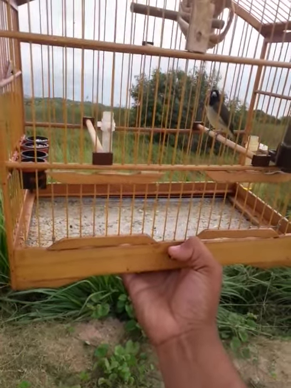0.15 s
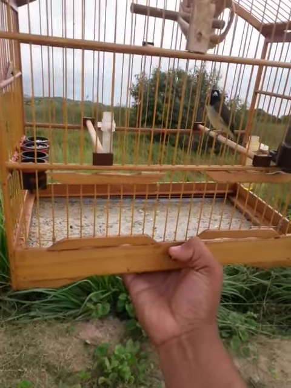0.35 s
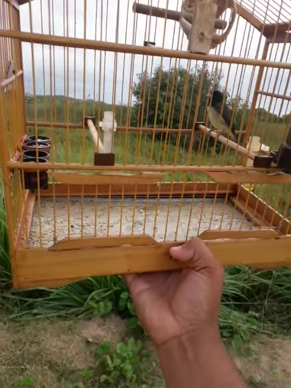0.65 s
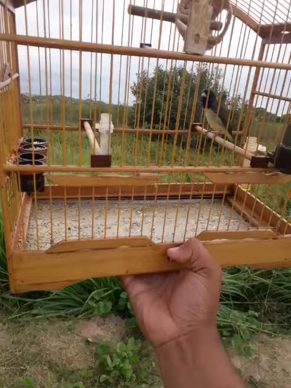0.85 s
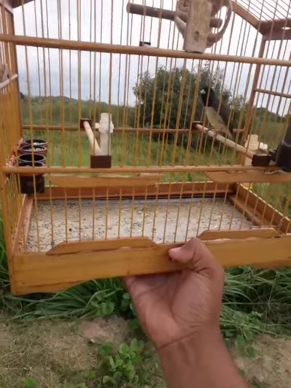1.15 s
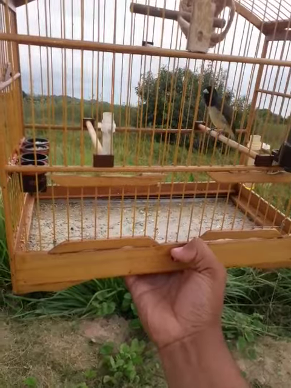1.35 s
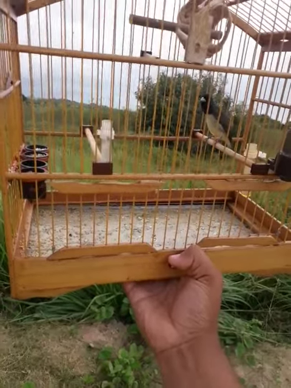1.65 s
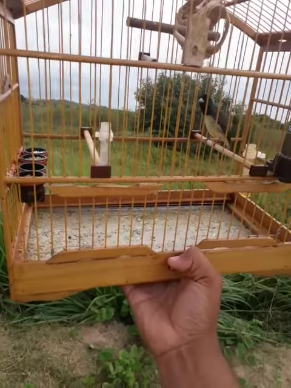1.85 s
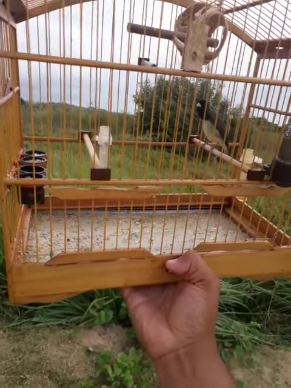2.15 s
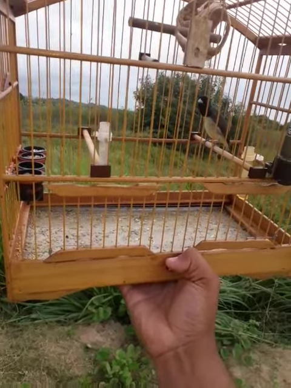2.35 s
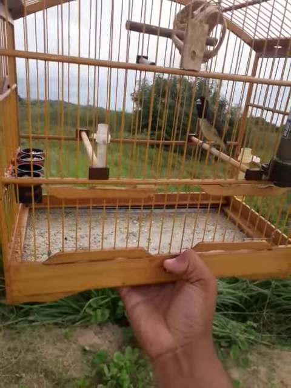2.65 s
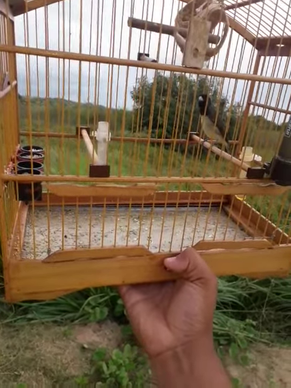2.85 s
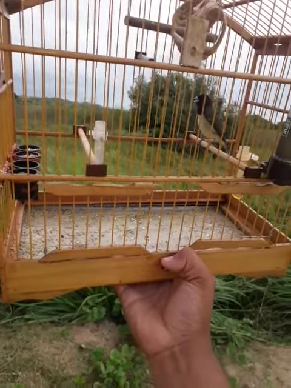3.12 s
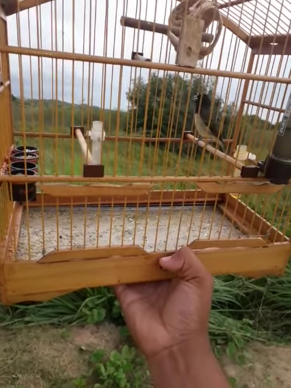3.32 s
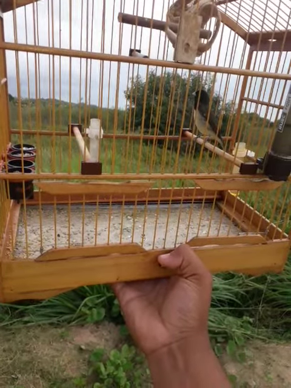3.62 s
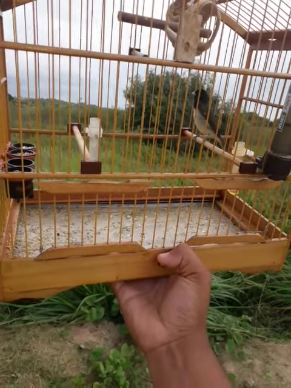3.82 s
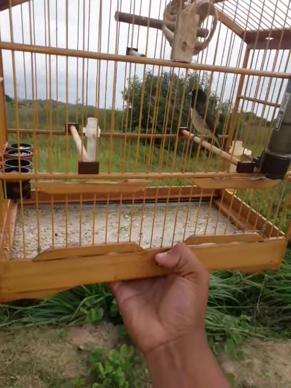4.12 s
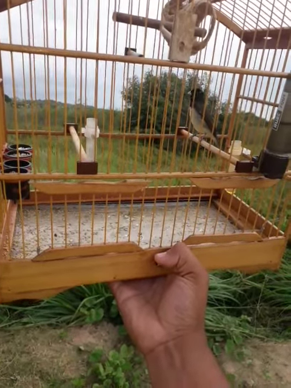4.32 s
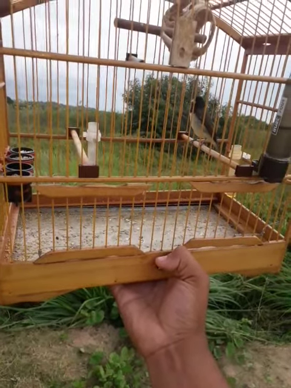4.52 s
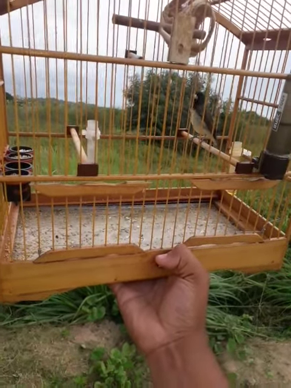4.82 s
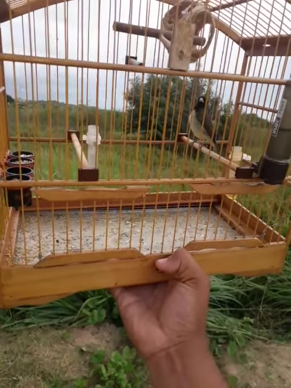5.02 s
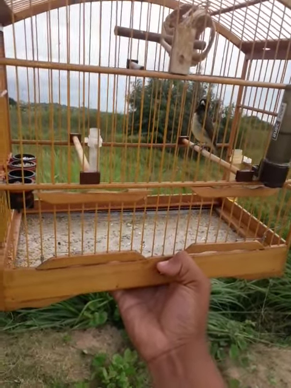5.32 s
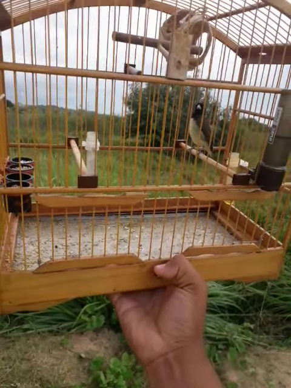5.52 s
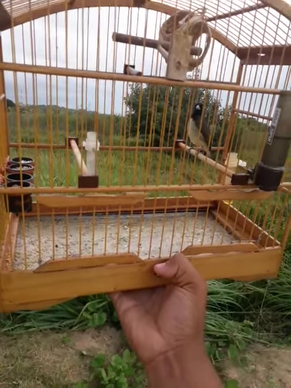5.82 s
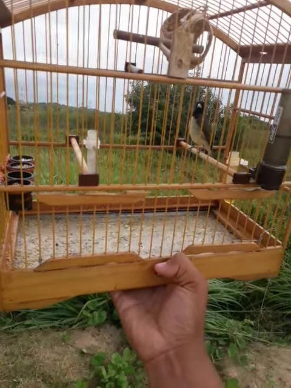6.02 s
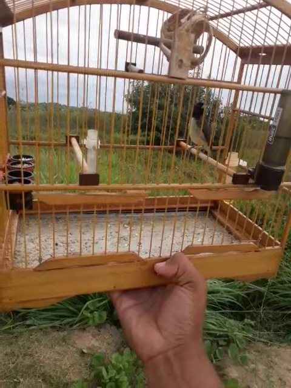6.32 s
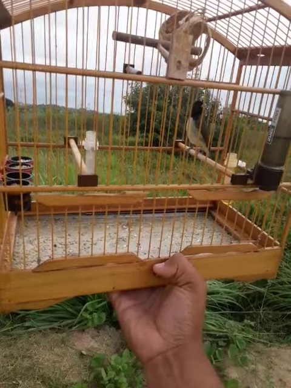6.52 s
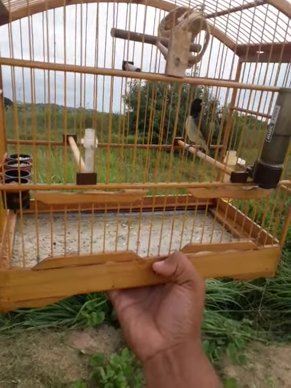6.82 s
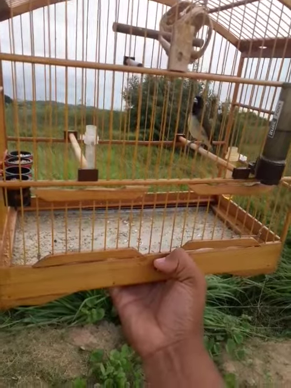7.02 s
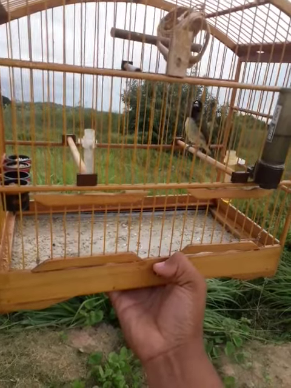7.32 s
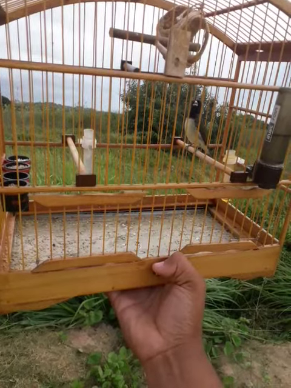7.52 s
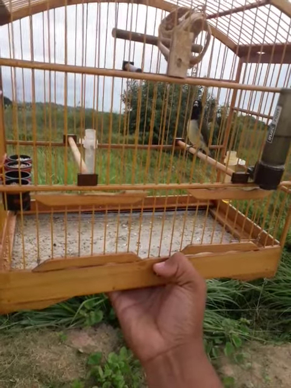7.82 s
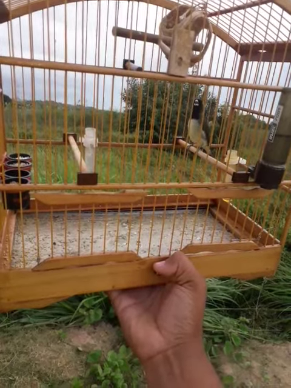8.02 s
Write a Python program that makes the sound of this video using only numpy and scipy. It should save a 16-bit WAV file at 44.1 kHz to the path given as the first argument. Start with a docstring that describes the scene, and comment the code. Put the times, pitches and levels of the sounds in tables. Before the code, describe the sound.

A small caged songbird gives quick, buzzy trills ending in high whistles, over faint insects, breeze and distant dogs.

```python
"""A small caged songbird sings in open grassland, an arm's length from a phone.
From the start, a low rumble and a breeze lie under rasping insects, far dogs and birds in the bushes.
At about 2.5 s the songbird gives three calls, each a buzzy trill of quick notes ending in a whistle.
Three more follow from 7 s, and at 8 s a last call warbles and slides down. The notes come from its
voice box (the syrinx), and the cage tray adds a short echo."""
import sys
import numpy as np
from scipy import signal
from scipy.fft import rfft, irfft, next_fast_len
from scipy.io import wavfile
from scipy.ndimage import uniform_filter1d, map_coordinates

SR = 44100
rng = np.random.default_rng(int(sys.argv[2]) if len(sys.argv) > 2 else 0)


def store_pcm(level_fs):
    """Save levels as 16-bit WAV."""
    pcm = np.round(np.clip(level_fs, -1, 1) * 32767).astype(np.int16)
    wavfile.write(sys.argv[1], SR, np.atleast_2d(pcm).T)


N = 359415

# The songbird's trills, each with a note held under the start of its whistle: (first note [s],
# last note [s], full level [dB], note end over note start [dB], note length [ms],
# held note's start pitch [Hz], its end pitch [Hz], its level [dB])
TRILLS = [(2.559, 2.64, -19, 6, 14.6, 4160, 3930, -20), (2.95, 3.049, -13, 5, 19.6, 4300, 4140, -12.5),
          (3.224, 3.336, -11.5, 5, 16.4, 4010, 4300, -23), (7.049, 7.127, -16, 3, 16.8, 3980, 4040, -31),
          (7.462, 7.544, -13.5, 5, 21.5, 3840, 4300, -7), (7.722, 7.839, -10.5, 6, 18.1, 3840, 3900, -24.5)]
# The whistle after each trill, one list of points each: (time [s], pitch [Hz], level [dB])
WHISTLES = [
    [(2.648, 4600, -21), (2.656, 4690, -17), (2.676, 4840, -16), (2.702, 5040, -20.5), (2.724, 4770, -17.5),
     (2.735, 4750, -37)],
    [(3.059, 4630, -17), (3.069, 4710, -11), (3.093, 4930, -8.5), (3.125, 4740, -7.5), (3.135, 4794, -16.5),
     (3.142, 4370, -26.5)],
    [(3.349, 4340, -13.5), (3.361, 4415, -9.5), (3.397, 4372, -11), (3.411, 4290, -15), (3.421, 4440, -24)],
    [(7.135, 4200, -20), (7.143, 4780, -19), (7.153, 4930, -14), (7.181, 4775, -11), (7.205, 4713, -13.5),
     (7.214, 4550, -26)],
    [(7.562, 4330, -11), (7.572, 4430, -15.5), (7.602, 4607, -4), (7.638, 4620, -7), (7.646, 4490, -10.5),
     (7.653, 4540, -33)],
    [(7.85, 4060, -21), (7.852, 4140, -11.5), (7.91, 4288, -10.5), (7.922, 4150, -12.5), (7.932, 4500, -34)],
]
# How each call sounds as the head turns. A partial is a tone at a multiple of the pitch. (start [s],
# tray echo strength [0-1], pitch the echo weakens [Hz], second partial [dB], third partial [dB])
HEAD_POSES = [(2.5, 0.33, 3994, -25, -31), (2.9, 0.34, 4030, -29.5, -24.5), (3.2, 0.41, 4193, -30.5, -23),
              (7.0, 0.2, 4230, -26, -26), (7.4, 0.61, 3963, -29.5, -21.5), (7.7, 0.25, 4090, -30, -19),
              (7.98, 0.32, 3986, -33, -38)]


def undb(db):
    """Turn decibels into a factor to multiply by."""
    return 10 ** (np.asarray(db) / 20)


def level(x, db):
    """Scale a sound to an average (rms) level."""
    return x * undb(db) / np.sqrt(np.mean(x ** 2))


def band(x, hz, width, order=2):
    """Keep the frequencies around hz."""
    sos = signal.butter(order, [hz - width / 2, hz + width / 2], "band", fs=SR, output="sos")
    return signal.sosfilt(sos, x)


def hiss(hz, width, order=2):
    """Noise around hz."""
    return band(rng.standard_normal(N), hz, width, order)


def wander(rate):
    """A smooth random curve, typically within -1 to 1, with `rate` new values a second."""
    hold = int(SR / rate)
    steps = np.repeat(rng.standard_normal(N // hold + 1), hold)
    return 1.317 * uniform_filter1d(uniform_filter1d(steps, hold), hold)[:N]


def add_note(out, s, hz, gain, partials):
    """Add a note at time s: pitch and gain per sample, partials as (multiple, level [dB])."""
    start = int(s * SR)
    phase = 2 * np.pi * (np.cumsum(hz) / SR + rng.random())
    tone = sum(undb(db) * np.sin(k * phase) * (k * hz < .45 * SR) for k, db in partials)
    out[start:start + len(tone)] += (np.sqrt(2) * gain * tone)[:N - start]


def glides(table, partials, wobble, edge, fade_db=0):
    """Notes that slide along a curved, unsteady pitch; a larger edge softens their ends."""
    out, drift = np.zeros(N), 1 + wobble * wander(60)
    for s, length_s, start_hz, end_hz, bend_hz, db in table:
        u = np.linspace(0, 1, int(length_s * SR))  # progress through the note
        hz = (start_hz + (end_hz - start_hz) * u + bend_hz * np.sin(np.pi * u)) * drift[:len(u)]
        drift = np.roll(drift, -len(u))
        add_note(out, s, hz, undb(db + fade_db * u) * np.sin(np.pi * u) ** edge, partials)
    return out


def field_echoes(x, fade_s, low_hz, high_hz, delay_s=0):
    """Grass and bushes scatter a sound into echoes that fall 60 dB in fade_s."""
    t = np.arange(int(fade_s * SR)) / SR
    tail = band(rng.standard_normal(len(t)), (low_hz + high_hz) / 2, high_hz - low_hz, order=1)
    tail *= 1000 ** (-t / fade_s)
    tail /= np.sqrt(np.sum(tail ** 2))
    return signal.fftconvolve(x, np.pad(tail, (int(delay_s * SR), 0)))[:N]


def air():
    """Distant rumble and breeze in the grass; soft gusts bump the microphone."""
    # The tone of the rumble and breeze: (frequency [Hz], relative level [dB])
    spectrum = [(30, -18), (70, -7.5), (140, -5), (200, -19.5), (500, -16), (1500, -31), (4500, -28.5),
                (10500, -31), (15700, -31)]
    hz, db = np.transpose(spectrum)
    size = next_fast_len(N)
    freqs = np.maximum(np.fft.rfftfreq(size, 1 / SR), 1)
    shape = undb(np.interp(np.log(freqs), np.log(hz), db))
    breeze = irfft(rfft(rng.standard_normal(size)) * shape, size)[:N]
    gusts = level(hiss(84.5, 68.8, order=3), -83) * undb(4.01 * wander(6))
    slack_start_db = -6 * np.exp(-np.arange(N) / SR / .3)
    return level(breeze, -66) * undb(wander(3.3) + slack_start_db) + gusts


def insects():
    """Countless wing clicks ring in narrow bands and throb a little."""
    # Bands of the chorus: (centre [Hz], width [Hz], level [dB], throb rate [Hz], throb depth [0-1])
    chorus = [(5457, 640, -63.5, 31.2, 0.15), (6543, 640, -50, 52, 0.25), (8996, 1210, -56, 190, .05),
              (12770, 2200, -75, 31, 0)]
    t, out = np.arange(N) / SR, np.zeros(N)
    for hz, width, db, throb_hz, depth in chorus:
        clicks = rng.standard_normal(N) * undb(2.4 * rng.standard_exponential(N))
        throb = 1 + depth * np.sin(2 * np.pi * throb_hz * t + .9 * wander(14))
        out += level(band(clicks, hz, width, order=3), db) * throb * undb(wander(14))
    return out * np.interp(t, [0, .8], [undb(-3), 1])


def katydid(stroke_hz=26.8):
    """One nearby bush cricket rasps on and off with quick strokes of its wings."""
    # Spells of rasping: (start [s], end [s], level [dB])
    spells = [(.55, 1.197, -77.5), (1.85, 2.6, -75), (4.45, 5.398, -74), (6.088, 7, -76.5)]
    t = np.arange(N) / SR
    gain = sum(undb(db) * (t > start) * (t < end) for start, end, db in spells)
    strokes = np.exp(-(stroke_hz * t % 1) / .15)
    wings = hiss(11700, 1300) + hiss(14900, 2000)
    return uniform_filter1d(gain, size=2000) * level(strokes * wings, 0)


def dogs(bark_s=.12, pitch_sag=.97):
    """Hoarse far barks: vocal folds shake unevenly, and breath fills the gaps between partials."""
    # Single barks: (time [s], strongest partial [Hz], relative level [dB])
    barks = [(0.015, 678.5, -76.5), (0.259, 1190, -76.5), (0.439, 556, -70), (.71, 1050, -80),
             (0.84, 559, -72), (1.022, 814, -73.5), (1.246, 959, -78.5), (1.495, 537.4, -69.5),
             (1.6, 579, -73.5), (1.831, 1017, -74), (1.93, 560.5, -68.5), (2.34, 878, -72),
             (2.42, 550, -76), (2.82, 608, -81.5), (3.051, 1042, -79.5), (3.2, 561, -74.5),
             (3.899, 494, -82), (4.549, 520, -81.5), (4.906, 1244, -81), (5.161, 572, -75.5),
             (5.424, 1204, -78.5), (5.59, 645, -77), (5.72, 628, -79.5), (5.86, 1214, -83),
             (6.03, 620, -83.5), (6.435, 1233, -80.5)]
    notes = [(s, bark_s, hz, pitch_sag * hz, 0, db) for s, hz, db in barks]
    tone = glides(notes, [(.5, -6), (1, 5), (2, 0), (3, -10)], wobble=.04, edge=.33, fade_db=-8)
    uneven = 1 + .75 * wander(250)
    loudness = uniform_filter1d(np.abs(tone), size=400)
    breath = loudness ** 2 / loudness.max() * level(hiss(1000, 1000), 0)  # mostly in the nearest barks
    pack = level(hiss(649, 160.04) + hiss(1114, 180.05), -80)  # more dogs, too far to tell apart
    voices = band(tone * uneven + breath, 1200, 1700)
    return undb(4) * voices + field_echoes(voices, .45, 300, 2500) + pack * undb(4 * wander(6))


def bush_whistles():
    """Other birds give thin single notes and faint chirps; one sings a phrase twice."""
    # Single notes: (time [s], length [s], start pitch [Hz], end pitch [Hz], bend in the middle [Hz],
    # relative level [dB]); all pitches are lowered 3% below
    singles = [(.145, .11, 3630, 3530, 402.5, -84.5), (.845, 0.018, 4170, 3770, -1, -69),
               (.975, .035, 3330, 2500, 5.5, -84), (1.03, .097, 1930, 2130, -1.5, -74),
               (1.24, 0.029, 3670, 2800, -38, -77), (1.6, 0.01115, 3280, 2780, 0, -71),
               (1.99, 0.03, 4400, 3640, 0, -75), (2.025, .035, 3750, 4700, 200, -78),
               (2.17, .115, 4130, 3665, 425.5, -71.5), (2.64, 0.1258, 2284, 2310, 5, -71.5),
               (4.12, 0.1317, 2980, 3140, 148.5, -81), (5.705, 0.0335, 2960, 4400, 305, -77),
               (5.815, 0.033, 3180, 4240, 302, -79), (5.878, 0.0512, 5700, 3680, 2, -66),
               (6.04, 0.0496, 3310, 2280, -100, -76.5), (6.29, 0.026, 3470, 2600, 3, -71),
               (6.55, 0.0858, 2500, 2060, -150, -68.5)]
    # The phrase: same columns, timed from its own start
    phrase = [(0, 0.0298, 3320, 2510, 0, -76), (0.038, .085, 2800, 2665, -80, -71.5),
              (0.162, .085, 2870, 2470, -83, -69.5), (0.226, .13, 2550, 2515, 263, -65),
              (0.399, .045, 3450, 2450, -100, -67), (.49, .06, 2170, 2536, 69, -65),
              (0.544, 0.097, 2170, 1927, -23, -63.5)]
    # Each time it is sung: (time [s], level change [dB])
    repeats = [(1.504, -1.5), (6.094, -4.5)]
    phrases = [(at_s + s, *shape, db + at_db) for at_s, at_db in repeats for s, *shape, db in phrase]
    chirps = [(when * N / SR, .02 + .08 * length, 2000 + 2500 * pitch, 2000 + 1250 * (pitch + bend),
               300 * bend, -95 + 8 * loud) for when, length, pitch, bend, loud in rng.random((45, 5))]
    return glides(singles + phrases + chirps, [(.97, .0081)], wobble=.019, edge=.5)


def bush_birds(warble_hz=132):
    """Whistles and buzzes (fast pitch wobble plus hiss) from the bushes, blurred by distance."""
    # Buzzy calls: (time [s], length [s], start pitch [Hz], end pitch [Hz], width [Hz],
    # relative level [dB])
    buzzes = [(0.669, 0.1, 4100, 3150, 504, -60.5), (.66, 0.084, 5300, 5000, 600, -67),
              (1.54, 0.18, 4390, 4210, 704, -69.5), (2.449, 0.21, 4220, 4240, 605, -66.5),
              (3.675, 0.19, 3810, 3610, 690, -73), (4.483, 0.18, 4220, 4010, 595, -70.5)]
    calls, t = bush_whistles(), np.arange(N) / SR
    waver, patchy, noise = 1.43 * wander(60), undb(3.4 * wander(170)), rng.standard_normal(N)
    for s, length_s, start_hz, end_hz, width, db in buzzes:
        u = np.clip((t - s) / length_s, 0, 1)
        hz = start_hz + (end_hz - start_hz) * u + width / 2 * np.sin(2 * np.pi * warble_hz * t + waver)
        tone = np.sin(2 * np.pi * np.cumsum(hz) / SR)
        breath = level(band(noise, (start_hz + end_hz) / 2, .95 * width), -8)
        calls += np.sin(np.pi * u) ** .46 * level(tone + breath, db) * patchy
    calls *= undb(2.1 * wander(50))
    return undb(-2) * (undb(5) * calls + field_echoes(calls, .33, 1670, 7100))


def head_partials(s):
    """Levels [dB] of the second and third partials for the head's pose at time s."""
    return [pose[-2:] for pose in HEAD_POSES if pose[0] < s][-1]


def second_voice(held_s=.024):
    """The voice box has two sides: one adds short notes while the other whistles."""
    # A low note joining the end of the last call: (time [s], length [s], start pitch [Hz],
    # end pitch [Hz], bend [Hz], relative level [dB])
    low_note = [(8.11, 0.059, 2392, 2387, 0, -19.5)]
    held = [(points[0][0], held_s, start_hz, end_hz, 0, db)
            for points, (*_, start_hz, end_hz, db) in zip(WHISTLES, TRILLS)]
    blips = [(8.033 + k * .0098, .006, 4300, 3630, 0, -26) for k in range(3)]  # below the warble
    notes = glides(held + blips, [(1, 0)], wobble=.003, edge=1)
    return notes + glides(low_note, [(1, -20), (2, 7), (3, -17.5)], wobble=.003, edge=.84)


def trill_notes(spacing_s=.014, jitter_s=.0005, scatter_db=1.5):
    """Time the notes of each trill, which starts softly and swells to full level."""
    for first_s, last_s, full_db, rise_db, note_ms, *_ in TRILLS:
        times = np.linspace(first_s, last_s, round((last_s - first_s) / spacing_s) + 1)
        for s in times:
            into_s = s - first_s
            start_db = full_db - 17.5 * np.exp(-into_s / .014)
            end_db = start_db + rise_db - 1.5 * np.exp(-into_s / .022)  # note ends swell later
            end_db -= 8.5 * (s == times[-1])  # the last note ends weakly
            shift_s, start_nudge, end_nudge = rng.standard_normal(3) * [jitter_s, scatter_db, scatter_db]
            yield s + shift_s, into_s, note_ms / 1000, start_db + start_nudge, end_db + end_nudge


def trills(end_hz=3520):
    """Nearly pure notes flick up and fall, following each other so fast that they buzz."""
    out, tremble_hz = np.zeros(N), 80 * wander(500)
    for s, into_s, length_s, start_db, end_db in trill_notes():
        u = np.linspace(0, 1, int(length_s * SR))
        top_hz = 4480 + 250 * into_s / .017 * np.exp(1 - into_s / .01474)  # notes 2 and 3 start highest
        hz = top_hz + (end_hz - top_hz) * u ** 2 - 350 * np.exp(-u / .0788)
        hz += tremble_hz[int(s * SR):][:len(u)]
        ramps = np.minimum(np.minimum(u / .19, (1 - u) / .27), 1)
        gain = undb(np.interp(u, [.35, .75], [start_db, end_db])) * np.sin(np.pi / 2 * ramps) ** 2
        second_db, third_db = head_partials(s)
        add_note(out, s, hz, gain, [(1, -.5), (2, second_db - 3.5), (3, third_db - 3.5)])
    return out


def throat_rasp():
    """Where two notes compete in the voice box, the air swirls and makes a high rasp."""
    swirl = hiss(12800, 5600) + 2 * hiss(5900, 3400, order=3)
    return level(swirl, -31) * undb(6 * wander(250))


def whistles(rasp, warble_hz=133, warble_depth_hz=864, warble_start_s=8.018, warble_fade_s=.034):
    """A breathy whistle ends each trill; the last call is a slide that starts with a fast warble."""
    # The long falling slide: (time [s], pitch [Hz], level [dB])
    slide = [(8.011, 4430, -27), (8.024, 5000, -19.5), (8.034, 5280, -12.5), (8.055, 5230, -14.5),
             (8.072, 5040, -3), (8.088, 4750, -4), (8.098, 4610, -3), (8.11, 4610, -4.5),
             (8.113, 4530, -10.5), (8.15, 4200, -15)]
    out, flutter = np.zeros(N), undb(.93 * wander(140))
    for points in [*WHISTLES, slide]:
        times, *columns = np.transpose(points)
        s = times[0]
        t = np.arange(s, times[-1], 1 / SR)
        here = slice(int(s * SR), int(s * SR) + len(t))
        hz, db = (uniform_filter1d(np.interp(t, times, column), size=350) for column in columns)
        if points is slide:
            age = np.maximum(t - warble_start_s, 0)
            fade = np.exp(-(age / warble_fade_s) ** 2)
            hz += warble_depth_hz * fade * np.sin(2 * np.pi * warble_hz * age)
            out[here] += 4 * fade * undb(db) * rasp[here]  # the warble rasps too
        ramps = np.clip(np.minimum(t - s, t[-1] - t) / .0021, 0, 1)
        gain = undb(db) * ramps * flutter[here]
        out[here] += gain * rasp[here] / 2  # a little breath
        add_note(out, s, hz, gain, [(1, 0)])
        beak_open = np.minimum((t - s) / .02473, 1)  # higher partials grow as the beak opens
        second_db, third_db = head_partials(s)
        add_note(out, s, hz, gain * flutter[:len(t)] ** 3 * beak_open, [(2, second_db), (3, third_db)])
    return out


def tray_echo(voice, delay_cycles=4.5):
    """The cage tray's echo returns half a cycle out of step at one pitch, and so weakens it."""
    starts, strength, weak_hz, *_ = np.transpose(HEAD_POSES)
    samples = np.arange(N)
    call = np.maximum(np.searchsorted(starts, samples / SR) - 1, 0)
    echo = map_coordinates(voice, [samples - delay_cycles * SR / weak_hz[call]], order=3)
    return (voice + strength[call] * echo) / (1 + strength[call])


def songbird():
    """The caged bird's trills and whistles, echoed by the tray and faintly by the nearest bushes."""
    buzz = (second_voice() + trills()) * undb(1.3 * wander(600))
    rasp = throat_rasp()
    voice = buzz + uniform_filter1d(np.abs(buzz), size=120) * rasp + whistles(rasp)
    mixed_tones = undb(-23) * voice ** 2 - undb(-17) * voice ** 3  # notes mix in the voice box
    near = tray_echo(voice + band(mixed_tones, 10800, 9600, order=3))
    return near + undb(-42) * field_echoes(near, .36, 3400, 9000, delay_s=.012)


def scene():
    """All the sounds meet at one microphone."""
    return (songbird() + dogs() + bush_birds() + insects() + katydid() + air())[None]


def record(dry, top_hz=15770):
    """The phone cuts off the highest treble."""
    return signal.sosfilt(signal.ellip(14, .3, 60, top_hz, fs=SR, output="sos"), dry)


dry = scene()
out = record(dry)
store_pcm(out)
```